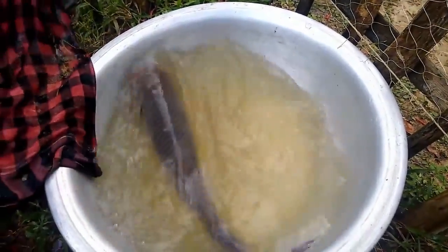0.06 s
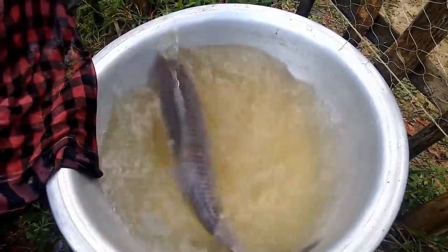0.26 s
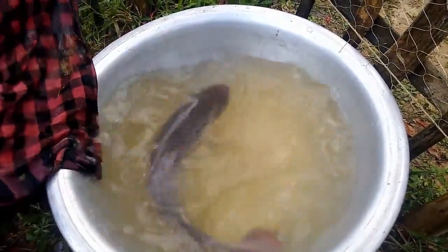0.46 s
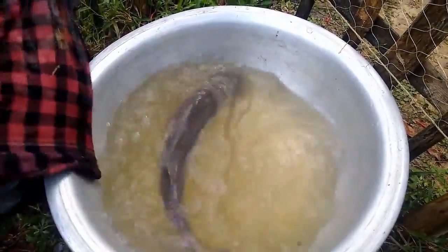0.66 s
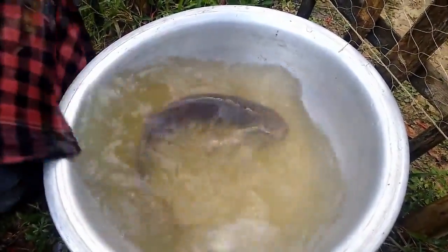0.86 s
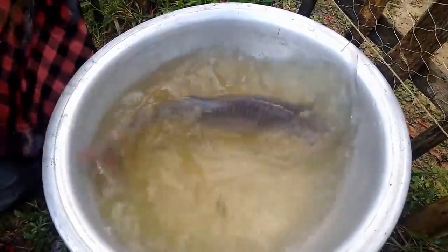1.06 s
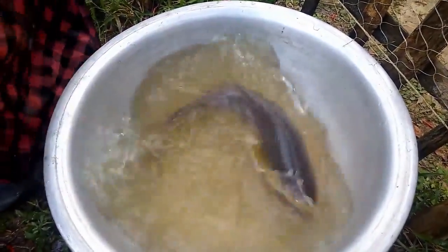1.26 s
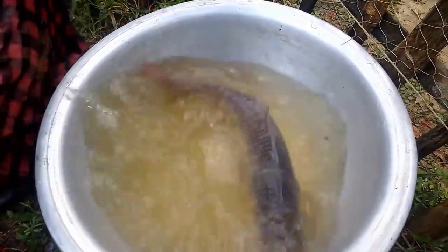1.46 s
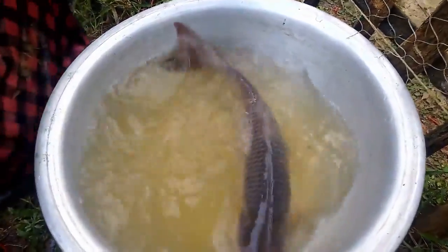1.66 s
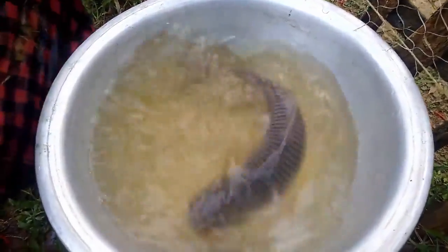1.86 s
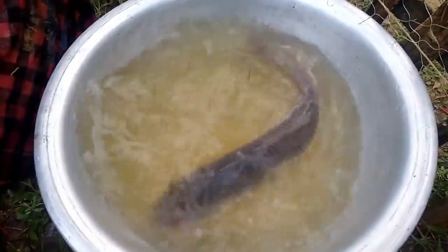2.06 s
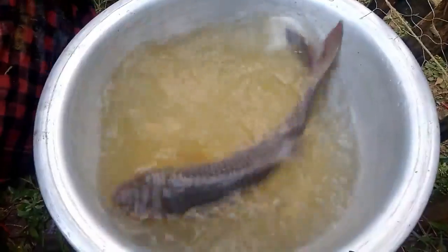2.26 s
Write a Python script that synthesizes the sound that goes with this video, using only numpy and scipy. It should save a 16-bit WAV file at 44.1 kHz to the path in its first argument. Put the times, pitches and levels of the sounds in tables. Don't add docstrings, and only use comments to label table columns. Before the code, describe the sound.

Short irregular splashes and bubbly plops as a live fish flails in a metal tub outdoors

```python
import sys
import numpy as np
from scipy import signal
from scipy.fft import rfft, irfft
from scipy.io import wavfile
from scipy.ndimage import uniform_filter1d

SR = 44100
rng = np.random.default_rng(int(sys.argv[2]) if len(sys.argv) > 2 else 0)


def elevation(decibels):
    levels = np.asarray(decibels, float)
    return 10 ** (levels / 20)


def master_out(mix):
    frames = np.transpose(np.atleast_2d(mix))
    ceiling = np.clip(frames, -1, 1)
    pcm = np.round(ceiling * 32767).astype(np.int16)
    wavfile.write(sys.argv[1], SR, pcm)


N = 101429

BUBBLE_ATTACK_S, WAVER = 0.0011, 0.036
LAP_DB, SWELL_DB = -67, 2.5
MIST_LEAD_S = 0.05


def evened(x):
    return x / np.sqrt(np.mean(x ** 2) + 1e-20)


def smooth_noise(count, size):
    return uniform_filter1d(rng.standard_normal(count), size=size)


def read(points, hz):
    f, value = np.transpose(points)
    return np.interp(np.log(hz + 1), np.log(f + 1), value)


def colour(x, points):
    hz = np.fft.rfftfreq(x.shape[-1], 1 / SR)
    return irfft(rfft(x) * elevation(read(points, hz)), x.shape[-1])


def add(mix, s, sound):
    part = mix[round(s * SR):][:len(sound)]
    part += sound[:len(part)]


def hiss(shape):
    # (frequency [Hz], level [dB per Hz])
    hiss_tone = [(40, 4), (300, 13), (2000, -21.5), (6000, -8), (15500, -9.5)]
    return elevation(-80.5) * evened(colour(rng.standard_normal(shape), hiss_tone))


def yard():
    # (frequency [Hz], level [dB per Hz])
    yard_tone = [(30, -30.5), (70, -1), (150, -2), (300, -11), (600, -19.5), (2500, -28.5), (8000, -48.5)]
    level_db = -62.5 + SWELL_DB * evened(smooth_noise(N, 3000))
    return elevation(level_db) * evened(colour(rng.standard_normal(N), yard_tone))


def taps(t60):
    t = np.arange(SR // 4) / SR
    sign = rng.choice([-1., 1.], len(t))
    present = rng.random(len(t)) < 0.06
    tail = sign * present * elevation(-60 * t / t60) * np.minimum(t / 0.00089, 1)
    return tail / np.linalg.norm(tail)


def stir(column, rest_db):
    # (start [s], rise [s], fall t60 [s], gurgle level [dB], spray level [dB])
    strokes = [(0, 0.0042, 0.17, -60.5, -73.5), (0.093, 0.0025, 0.36, -48, -69),
               (0.22, 0.019, 0.39, -34, -53.5), (.30, 0.0067, 0.22, -46.5, -56.5),
               (0.372, 0.019, 0.28, -30.5, -45.5), (0.441, 0.019, 0.13, -45, -50),
               (0.823, 0.0018, 0.11, -46.5, -69), (0.908, 0.0028, 0.37, -44, -61),
               (.94, 0.026, 0.18, -43.5, -49.5), (0.69, 0.0088, 0.23, -60, -71.5),
               (1.188, 0.017, 0.59, -63, -62), (1.248, 0.0026, 0.53, -36, -51),
               (1.318, 0.046, 0.12, -27, -37.5), (1.435, 0.0073, 0.064, -55, -61),
               (1.689, 0.014, 1, -58, -66), (1.79, 0.0045, 0.16, -42, -63.5),
               (1.829, 0.023, 0.53, -40.5, -66.5), (1.887, 0.0024, 0.28, -38.5, -55),
               (2.028, 0.0033, 0.098, -43.5, -59), (2.08, 0.011, 0.13, -54.5, -65.5),
               (2.195, 0.012, 0.18, -54.5, -73)]
    t = np.arange(N) / SR
    power = elevation(rest_db + SWELL_DB * evened(smooth_noise(N, 2500))) ** 2
    for row in strokes:
        start, rise, fall = row[:3]
        u = t - start
        swell = np.clip(u / rise, 0, 1) ** 2
        ebb_db = -60 * np.maximum(u - rise, 0) / fall
        power = power + (swell * elevation(row[column] + ebb_db)) ** 2
    return np.sqrt(power)


def surge():
    # (frequency [Hz], level [dB per Hz])
    surge_tone = [(20, -3.5), (60, -7), (150, 5), (320, 0), (700, -39.5)]
    same = 0.92
    drive = uniform_filter1d(stir(3, LAP_DB), size=300)
    push = elevation(-15.5) * evened(colour(rng.standard_normal((2, N)), surge_tone)) * drive
    return np.array([push[0], np.sqrt(1 - same ** 2) * push[1] - same * push[0]])


def mist(length, db, hz):
    band = signal.butter(2, [0.51 * hz, min(1.66 * hz, 0.45 * SR)], "band", fs=SR)
    puff = signal.lfilter(*band, rng.standard_normal(SR // 10))
    u = np.arange(len(puff)) / SR - MIST_LEAD_S
    return elevation(db) * evened(puff) * np.exp(-(4 * u / length) ** 2 / 2)


def tick(db, hz, t60):
    t = np.arange(SR // 10) / SR
    f = np.fft.rfftfreq(len(t), 1 / SR)
    resonance = 1 / (1 + ((f - hz) / (0.5 * hz)) ** 2) ** 2
    burst = evened(irfft(rfft(rng.standard_normal(len(t))) * resonance, len(t)))
    return 0.5 * elevation(db - 60 * t / max(t60, 0.005)) * burst * np.minimum(t / 0.0003, 1)


def grains(drive, lo_hz, hi_hz, cycles, spread_db, per_s, tone, count=32):
    size = elevation(spread_db * np.minimum(rng.exponential(1, N), 4)) * (rng.random(N) < per_s / SR)
    size = evened(size) * drive
    kind = rng.integers(0, count, N)
    out = np.zeros(N)
    for k, hz in enumerate(np.geomspace(lo_hz, hi_hz, count)):
        u = np.arange(2500) * hz / SR
        shape = np.exp(-u / cycles) * (1 - np.exp(-u / 0.5))
        grain = shape * np.sin(2 * np.pi * u * (1 + 0.00636 * u))
        grain = elevation(read(tone, hz)) * grain / np.linalg.norm(grain)
        out += signal.oaconvolve(size * (kind == k), grain)[:N]
    return out


def churn():
    # (frequency [Hz], level [dB])
    gurgle_tone = [(250, -32.5), (450, -12.5), (800, -2.5), (1400, 1.5), (2000, -4.5), (3000, -1.5)]
    # (frequency [Hz], level [dB])
    spray_tone = [(800, -39), (1500, 8), (2300, 12), (3500, 10), (5000, -4), (7000, -28.5), (11000, -19.5),
                  (15000, -26)]
    gurgle = grains(stir(3, LAP_DB), 303, 2604, 5.5, 2.26, 1800, gurgle_tone)
    spray = grains(stir(4, -79.5), 993, 13040, 7.3, 3.73, 10000, spray_tone)
    return gurgle + spray


def pocket(length, db, from_hz, to_hz):
    t = np.arange(SR // 10) / SR
    sway = evened(uniform_filter1d(smooth_noise(len(t), 60), size=60))
    glide = from_hz * (to_hz / from_hz) ** np.minimum(t / length, 1.3)
    turns = np.cumsum(glide * (1 + WAVER * sway)) / SR
    tail_db = -60 * np.maximum(t - length, 0) / 0.013
    shape = np.minimum(t / BUBBLE_ATTACK_S, 1) * elevation(db + tail_db)
    rough = 1 + 0.2 * np.tanh(sway[::-1])
    return shape * rough * np.sin(2 * np.pi * turns)


def plop(db, hz, t60):
    t = np.arange(SR // 8) / SR
    sway = evened(smooth_noise(len(t), 100))
    turns = np.cumsum((hz + 4000 * t) * (1 + WAVER * sway)) / SR
    shape = elevation(db - 60 * t / max(t60, 0.005)) * np.minimum(t / BUBBLE_ATTACK_S, 1)
    return shape * np.sin(2 * np.pi * turns)


def water():
    # (time [s], peak level [dB], pitch [Hz], t60 [s])
    plops = [(0.094, -25.5, 1330, 0.016), (0.101, -32.5, 1422, 0.044), (0.121, -28.5, 660, 0.03),
             (0.173, -37.5, 600, 0.03), (0.222, -36, 1076, 0.042), (0.247, -42, 1438, 0.11),
             (0.253, -31, 1515, 0.081), (0.266, -21, 915, 0.02), (0.276, -31, 850, 0.074),
             (0.326, -31.5, 724, 0.03), (0.38, -26, 970, 0.032), (0.442, -26, 712, 0.04),
             (0.825, -28, 1417, 0.036), (0.909, -28.5, 868, 0.059), (0.934, -40, 844, 0.075),
             (1.15, -49, 1060, 0.035), (1.444, -44.5, 569.5, 0.13), (1.459, -37.5, 1140, 0.035),
             (1.791, -13, 1044, 0.024), (1.89, -21, 1205, 0.019), (2.027, -24, 700, 0.04),
             (2.081, -34, 1550, 0.012), (2.196, -53.5, 944, 0.059)]
    # (time [s], peak level [dB], pitch [Hz], t60 [s])
    low_plops = [(1.790, -31.5, 140, 0.024), (.246, -33, 450, 0.061), (.825, -39, 794, 0.063),
                 (.910, -40, 570, 0.13), (1.251, -23.5, 1280, 0.032), (1.790, -19.5, 512, 0.034),
                 (1.81, -35, 580, 0.028), (1.889, -34, 470, .08), (0.079, -54, 4600, 0.018),
                 (1.652, -55, 3900, 0.03), (1.789, -42, 2900, 0.088), (1.632, -50.5, 447, 0.09),
                 (1.721, -49, 260, .06), (1.790, -25.5, 710, 0.021)]
    # (start [s], length [s], level [dB], start [Hz], end [Hz])
    pockets = [(.415, 0.014, -19.5, 566, 669), (0.472, 0.019, -43.5, 627, 748),
               (0.533, 0.038, -56.5, 783, 972), (0.881, 0.014, -57.5, 790, 760),
               (0.954, 0.02, -36.5, 747, 885), (0.971, 0.012, -43, 943, 944),
               (0.997, 0.021, -49.5, 1297, 1870), (1.248, 0.018, -26, 1039, 1153),
               (1.272, 0.0063, -34.5, 995, 1266), (1.333, 0.0098, -24.5, 697, 870),
               (1.343, 0.015, -24, 951, 1310), (1.865, 0.018, -44.5, 660, 680),
               (1.914, 0.03, -45, 550, 670), (1.899, 0.028, -41, 1454, 1241)]
    # (time [s], peak level [dB], centre [Hz], t60 [s])
    ticks = [(0.096, -32.5, 3830, .015), (0.184, -46.5, 2380, 0.12), (0.223, -41, 3450, 0.037),
             (0.247, -30, 3430, 0.092), (.266, -36.5, 6500, 0.01), (0.376, -22, 2840, 0.015),
             (0.379, -47, 10900, 0.018), (.412, -55, 11000, 0.07), (.388, -42, 3330, 0.06),
             (.573, -34, 3600, 0.018), (0.6116, -29, 2500, 0.025), (.824, -39.5, 4330, 0.018),
             (0.909, -23.5, 2790, 0.011), (1.252, -26.5, 3000, 0.057), (1.349, -66, 12000, 0.2),
             (1.707, -56, 4650, .02), (.910, -64, 9100, 0.023), (1.888, -39, 3860, 0.09),
             (1.891, -59.5, 10900, 0.12), (1.357, -39, 3250, 0.075), (1.251, -53, 5940, 0.22),
             (2.197, -45, 2260, .03)]
    # (time [s], peak level [dB], pitch [Hz], t60 [s])
    droplets = [(.126, -39, 477, 0.047), (.096, -39.5, 700, 0.027), (.172, -50, 445, 0.037),
                (.305, -45, 3210, .03), (.3944, -35, 3490, .03), (.4148, -38, 3440, .02),
                (.4587, -39.5, 3490, 0.027), (.472, -44, 3100, 0.027), (.565, -51, 3600, 0.016),
                (.678, -53, 1520, .03), (.699, -49.5, 1600, 0.045), (.751, -51, 2500, 0.025),
                (.777, -56, 2800, 0.037), (.531, -52, 1400, .03), (1.25, -32, 2570, 0.052),
                (1.322, -34, 2590, 0.027), (1.342, -37, 2840, 0.023), (1.3573, -30, 3007, 0.032),
                (1.368, -32, 3520, 0.036), (1.4394, -43.5, 3520, 0.044), (1.844, -38.5, 1296, .03),
                (1.856, -37, 1130, .04), (1.81, -35, 1100, .03), (1.95, -49, 4100, 0.021),
                (1.998, -52.5, 4300, .02), (2.038, -50.5, 3390, 0.027), (2.238, -53.5, 1200, .05),
                (1.892, -42, 2946, .04), (1.912, -46, 3700, 0.026), (.002, -53, 1460, 0.027),
                (.055, -55.5, 1290, 0.055), (2.028, -36, 560, .04), (.612, -46, 2600, .02),
                (1.79, -46, 3150, .05), (.065, -56, 480, .06), (2.222, -54, 2550, .03),
                (1.95, -54, 290, .08)]
    # (start [s], length [s], level [dB], start [Hz], end [Hz])
    more_pockets = [
        (1.962, 0.0506, -56, 430, 650),
        (1.866, .015, -47.5, 1350, 1454),
        (1.962, .02, -52.5, 1500, 1500),
        (1.935, .018, -49, 620, 620),
        (.428, .02, -35.5, 676, 725),
    ]
    # (middle [s], length [s], peak level [dB], centre [Hz])
    mists = [
        (.255, .045, -63, 14400),
        (.2668, .003, -46, 10000),
        (.097, .012, -69, 9400),
        (1.259, .028, -61, 12000),
        (1.354, .013, -60, 12000),
        (1.370, .013, -58.5, 11000),
        (.424, .028, -63, 13000),
        (.911, .011, -67, 15000),
        (.574, .007, -68, 7100),
        (1.41, .05, -67, 11000),
    ]
    out = churn()
    for voice, table in ((plop, plops), (plop, low_plops), (pocket, pockets),
                         (tick, ticks), (plop, droplets), (pocket, more_pockets)):
        for s, *row in table:
            add(out, s, voice(*row))
    basin = elevation(-11) * taps(0.14)
    out = out + signal.oaconvolve(out, basin)[:N]
    for s, *row in mists:
        add(out, s - MIST_LEAD_S, mist(*row))
    return out


def scene():
    # (frequency [Hz], difference [dB])
    balance = [(60, 1), (400, 1), (1500, 2), (5000, 8), (15000, 10)]
    # (frequency [Hz], level [dB])
    apart = [(100, -14), (1000, -20), (2500, -10), (4500, -2), (12000, 2)]
    delay_s, drift_hz, scatter_t60_s = 0.000445, 6, 0.025
    left = water() + yard()
    hz = np.fft.rfftfreq(N, 1 / SR)
    turn = 2 * np.pi * drift_hz * np.arange(N) / SR
    scattered = sum(signal.oaconvolve(left * w, taps(scatter_t60_s))[:N] for w in (np.sin(turn), np.cos(turn)))
    spectrum = rfft(left + colour(scattered, apart))
    later = np.exp(-2j * np.pi * hz * delay_s)
    right = -irfft(spectrum * elevation(-read(balance, hz)) * later, N)
    return np.array([left, right]) + surge()


def low_pass(x):
    return signal.sosfilt(signal.butter(12, 15700, fs=SR, output="sos"), x)


def record(dry):
    return low_pass(dry + hiss(dry.shape))


dry = scene()
out = record(dry)
master_out(out)
```